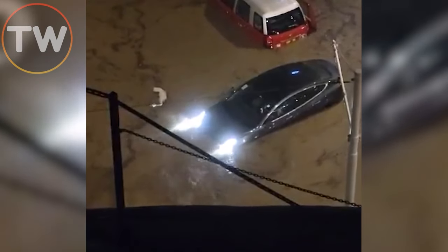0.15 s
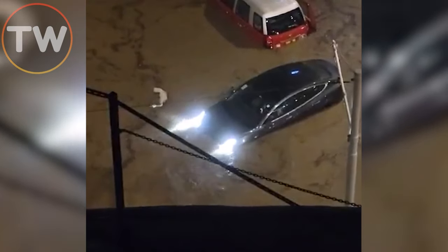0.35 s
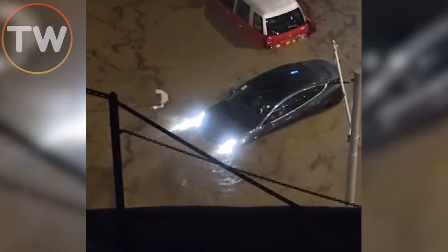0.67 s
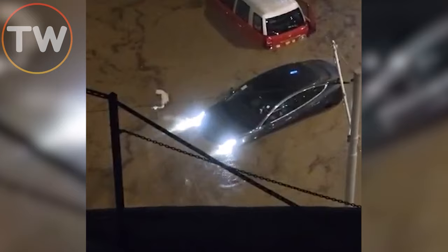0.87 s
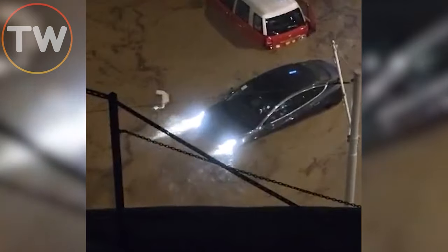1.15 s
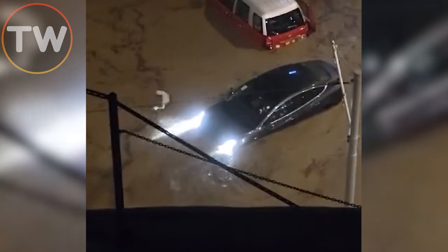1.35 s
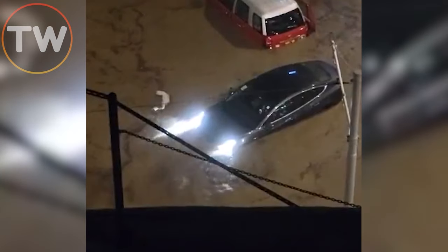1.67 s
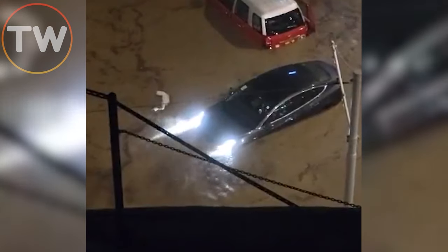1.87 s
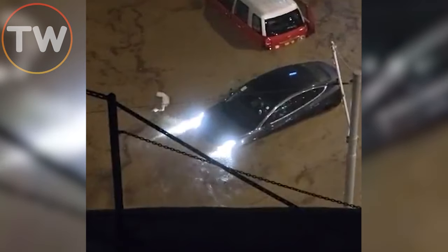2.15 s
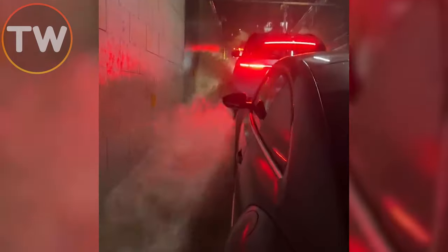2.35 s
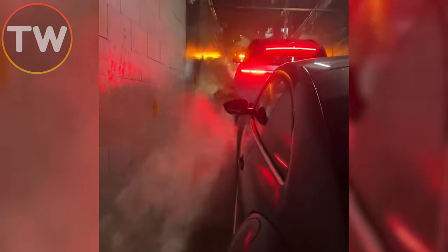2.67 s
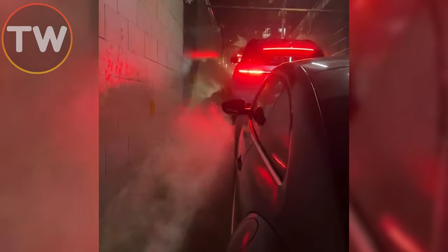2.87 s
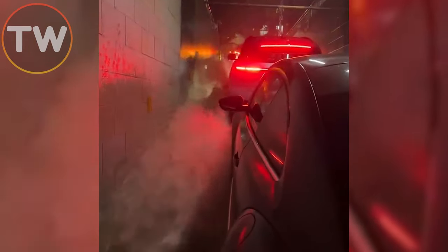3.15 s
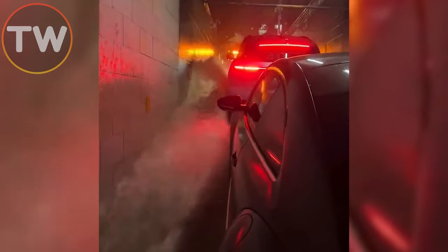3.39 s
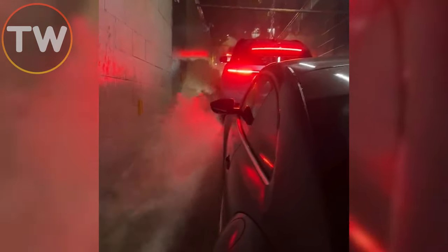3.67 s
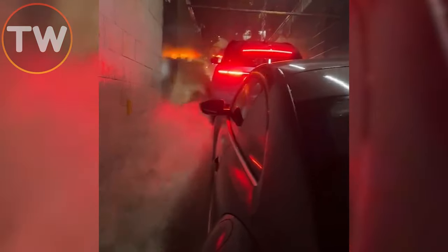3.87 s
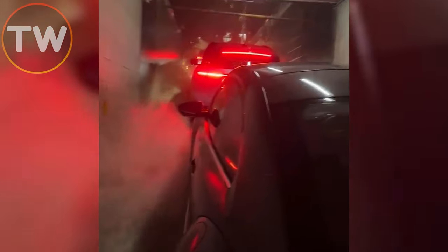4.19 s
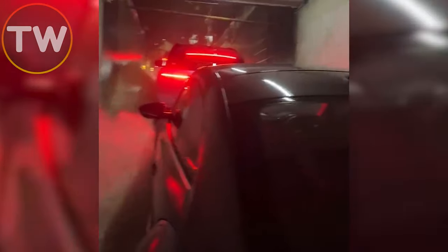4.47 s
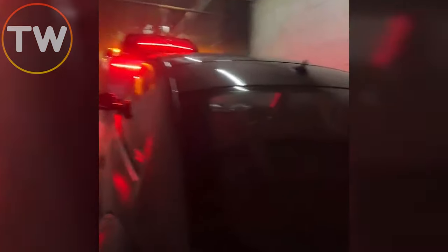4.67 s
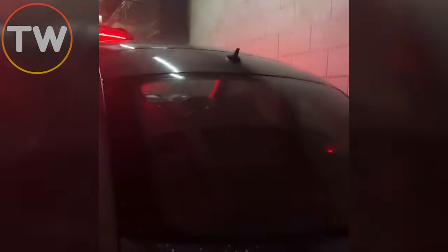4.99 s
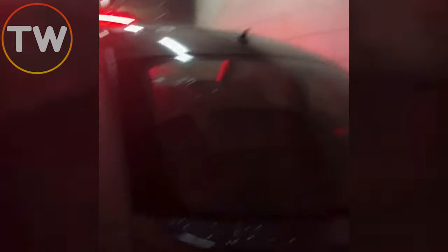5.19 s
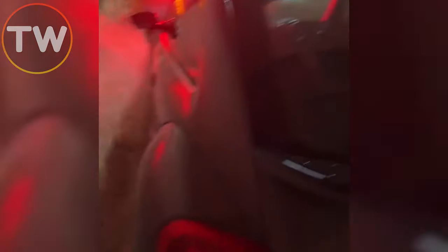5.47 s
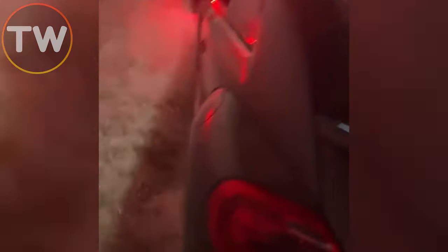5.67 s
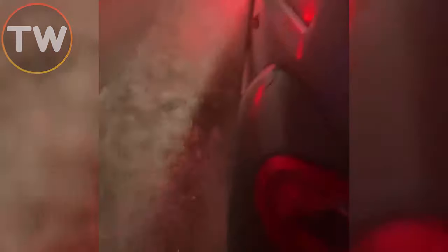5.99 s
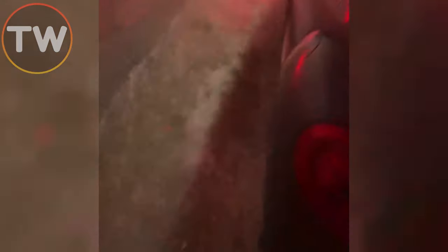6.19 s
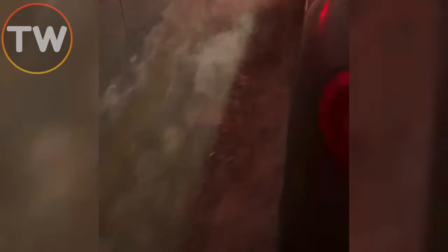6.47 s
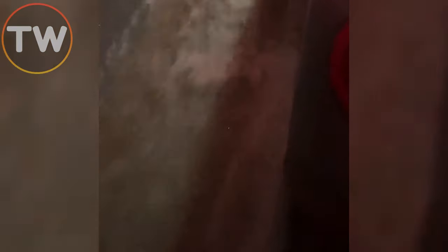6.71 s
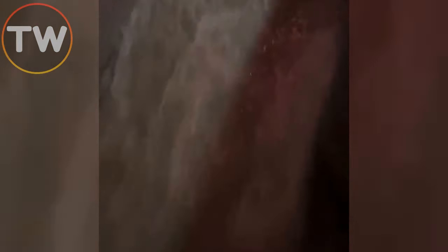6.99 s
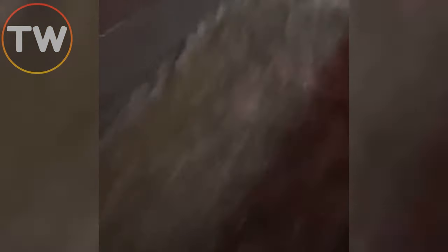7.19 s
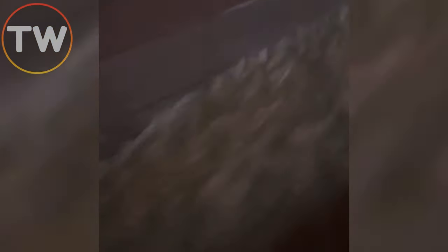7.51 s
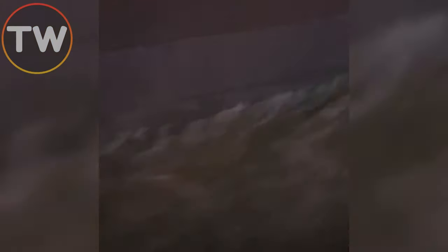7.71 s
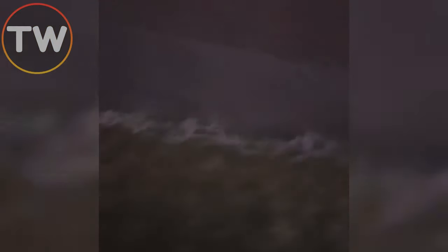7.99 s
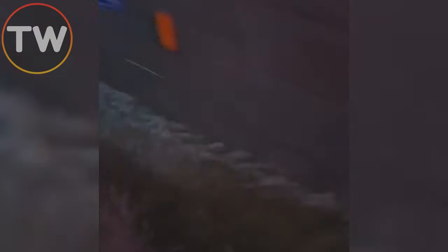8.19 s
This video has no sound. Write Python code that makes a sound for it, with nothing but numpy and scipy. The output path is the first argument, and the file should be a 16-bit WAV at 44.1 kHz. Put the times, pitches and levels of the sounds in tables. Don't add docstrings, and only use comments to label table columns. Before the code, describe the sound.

Dense downpour roar with a faint low engine idle and a quick buzzy car horn, cut off sharply, then steadier, softer torrent noise.

```python
import sys
import numpy as np
from scipy import signal
from scipy.fft import dct
from scipy.io import wavfile
from scipy.ndimage import uniform_filter1d, map_coordinates

SR = 44100
rng = np.random.default_rng(int(sys.argv[2]) if len(sys.argv) > 2 else 0)


def gain_from_decibels(decibels):
    exponent = np.asarray(decibels, float) / 20
    return 10 ** exponent


def unload_audio(sound):
    columns = np.transpose(np.atleast_2d(sound))
    steps = np.round(np.clip(columns, -1, 1) * 32767)
    wavfile.write(sys.argv[1], SR, steps.astype(np.int16))


N = 368182
CUT_S, RESUME_S = 2.36665, 2.6455
WINDOW = 1024
TAPER = np.sin(np.pi * (np.arange(2 * WINDOW) + .5) / (2 * WINDOW))


def street_rain():
    # f/Hz, level/dB per Hz
    colour = [(15, -57), (30, -21.5), (56, -8), (150, -6.5), (250, -3), (410, -1.5), (750, -5.5),
              (1200, -2.5), (2350, -4), (4070, -14), (8300, -18.5), (9500, -22.5), (10200, -31),
              (13700, -27.5)]
    # f/Hz, step/dB above the noise there
    steps = [(300, -10), (1500, -3), (2500, 3), (3100, 7.5), (4500, 6.5), (6500, 4), (9300, 5), (10000, 11),
             (10700, 7.5), (13500, 6.5)]
    return water(colour, downpour, steps, per_s=30000, spread_db=1.0,
                 surge_db=0.92, patch_db=1.0, flicker_db=0.95, jump_db=2.5)


def downpour(s):
    # t/s, level/dB
    strength = [
        (0, -18),
        (.6, -17),
        (1.3, -17),
        (1.8, -16),
        (2.1, -16),
        (2.37, -17.5),
    ]
    level_db = column(strength, 1, s)
    swing_db = level_db - np.mean(np.array(strength)[:, 1])
    rumble_follows, hiss_follows = -0.36, -.3
    return level_db, rumble_follows * swing_db, hiss_follows * swing_db


def ramp_water():
    # f/Hz, level/dB per Hz
    colour = [(15, -55), (30, -27), (65, -6), (105, -5), (220, -2.5), (325, -1.5), (800, -4.5),
              (2500, -4.5), (3600, -8), (4500, -12), (6000, -12.5), (8800, -17), (10300, -18),
              (13700, -22.5)]
    # f/Hz, step/dB above the noise there
    steps = [(300, -12), (3000, -4), (6000, 1), (10000, 4), (12500, 5.5), (13600, 8)]
    return water(colour, torrent, steps, per_s=30000, spread_db=.8,
                 surge_db=0.28, patch_db=0.62, flicker_db=0.46, jump_db=2.5)


def torrent(s):
    since_duck = np.maximum(s - 3.16, 0)
    turned_s = np.maximum(s - 3.95, 0)
    fast = 1 - np.exp(-since_duck / .035)
    slow = 1 - np.exp(-since_duck / 0.84)
    level_db = -22 - 3.5 * fast - 3.5 * slow + 0.47 * turned_s
    rumble_db = -0.24 * slow + 0.2 * turned_s
    hiss_db = 0.74 - 0.54 * turned_s
    return level_db, rumble_db, hiss_db


def water(colour, flow, steps, per_s, spread_db, surge_db, patch_db, flicker_db, jump_db):
    cells = to_cells(splashes(per_s, spread_db))
    s = np.arange(len(cells)) * WINDOW / SR
    hz = np.maximum((np.arange(WINDOW) + .5) * SR / 2 / WINDOW, 15)
    surges_db = surge_db * patches(hz, s, .4, 9.0)
    swell_db = surges_db + patch_db * patches(hz, s, 2.98, 6.0)
    cells = cells * gain_from_decibels(flicker_db * patches(hz, s, 6.0, 25.0))
    step = gain_from_decibels(at_hz(steps, hz) + jump_db * patches(hz, s, 16.0, 26.0, order=0))
    cells = np.sign(cells) * np.floor(np.abs(cells) / step + .4) * step
    cells = cells / uniform_filter1d(np.sqrt(np.mean(cells ** 2, axis=0)) + 1e-9, size=25)
    lows = np.clip(np.log2(900 / hz), 0, 1)
    tops = np.clip(np.log2(hz / 2300), 0, 1)
    _, rumble_db, hiss_db = flow(s)
    tilt_db = np.outer(rumble_db, lows) + np.outer(hiss_db, tops)
    sound = from_cells(cells * gain_from_decibels(at_hz(colour, hz) + tilt_db + swell_db))
    middle_band = signal.butter(4, [700, 3000], "band", fs=SR, output="sos")
    middle = signal.sosfilt(middle_band, sound)
    level_db = flow(np.arange(N) / SR)[0]
    return sound / np.sqrt(np.mean(middle ** 2)) * gain_from_decibels(level_db)


def splashes(per_s, spread_db):
    sizes = gain_from_decibels(spread_db * np.minimum(rng.exponential(1, N), 5)) * rng.standard_normal(N)
    return rms_one(sizes * (rng.random(N) < per_s / SR))


def patches(hz, s, per_octave, per_s, order=1):
    where = np.meshgrid(s * per_s, np.log2(hz / hz[0]) * per_octave, indexing="ij")
    field = map_coordinates(rng.standard_normal((400, 200)), where, order=order, mode="wrap")
    return field * (1 + .4 * order)


def horn():
    # multiple of the base pitch, level/dB
    partials = [(5, -8), (6, -4), (7, 0), (8, -6), (9, -11)]
    base_hz = 483.2
    t = np.arange(N) / SR
    shakes = uniform_filter1d(rng.standard_normal((len(partials), N)), size=600, axis=1)
    tone = np.zeros(N)
    for (multiple, level_db), shake in zip(partials, shakes):
        tone += gain_from_decibels(level_db) * np.sin(2 * np.pi * multiple * base_hz * t + 26 * shake)
    start_s, attack_s, hold_s, release_s = .522, .014, .15, .03
    corners = start_s + np.cumsum([0, attack_s, hold_s, release_s])
    return tone * gain_from_decibels(-23) * np.interp(t, corners, [0, 1, 1, 0]) ** 2


def idle():
    # t/s, f/Hz, level/dB
    engine = [
        (0, 62, -46),
        (1.2, 60, -45),
        (1.5, 54, -39),
        (1.9, 55, -37),
        (2.37, 60, -37),
    ]
    t = np.arange(N) / SR
    unsteady = uniform_filter1d(rng.standard_normal(N), size=4000)
    phase = 2 * np.pi * np.cumsum(column(engine, 1, t)) / SR
    return gain_from_decibels(column(engine, 2, t) + 3) * np.sin(phase + 40 * unsteady)


def difference(mid, level_db):
    shift = 687
    cells = to_cells(np.roll(mid, -shift))
    s = np.arange(len(cells)) * WINDOW / SR
    hz = (np.arange(WINDOW) + .5) * SR / 2 / WINDOW
    when, where, wide = rng.random((3, len(cells)))
    per_s = np.where(s < CUT_S, .5, 3.2)
    parted = when < per_s * WINDOW / SR
    low_hz = 4500 * (12000 / 4500) ** where
    octaves = .25 * (.5 + 2 * wide ** 4 + .3)
    high_hz = low_hz * 2 ** octaves
    mask = parted[:, None] * (hz > low_hz[:, None]) * (hz < high_hz[:, None])
    signs = rng.choice([-1, 1], cells.shape)
    return np.roll(from_cells(cells * mask * gain_from_decibels(level_db) * signs), shift)


def phone_top(x):
    edge = signal.ellip(12, .2, 45, 13890, fs=SR, output="sos")
    return signal.sosfiltfilt(edge, x)


def to_cells(x):
    slices = np.pad(x, (WINDOW, 2 * WINDOW - len(x) % WINDOW)).reshape(-1, WINDOW)
    a, b, c, d = np.split(np.hstack([slices[:-1], slices[1:]]) * TAPER, 4, axis=1)
    return dct(np.hstack([-c[:, ::-1] - d, a - b[:, ::-1]]), type=4, norm="ortho")


def from_cells(cells):
    u, v = np.split(dct(cells, type=4, norm="ortho"), 2, axis=1)
    slices = np.hstack([v, -v[:, ::-1], -u[:, ::-1], -u]) * TAPER
    return (slices[:-1, WINDOW:] + slices[1:, :WINDOW]).ravel()[:N]


def rms_one(x):
    return x / np.sqrt(np.mean(x ** 2) + 1e-20)


def column(rows, k, s):
    return np.interp(s, np.array(rows)[:, 0], np.array(rows)[:, k])


def at_hz(points, hz)  :
    return np.interp(np.log(hz), np.log(np.array(points)[:, 0]), np.array(points)[:, 1])


def scene():
    t = np.arange(N) / SR
    street = street_rain() + horn() + idle()
    street = street / (1 + (street / .9) ** 8) ** (1 / 8)
    ramp = ramp_water()
    near_cut = np.exp((t - CUT_S).clip(None, 0) / .00016)
    street = phone_top(street) * (1 - near_cut) + near_cut
    lead_in = gain_from_decibels(-14) * (t > 2.6345)
    ramp = phone_top(ramp * np.where(t > RESUME_S, 1, lead_in))
    mid = street * (t < CUT_S) + ramp
    side = difference(mid, -2)
    return np.array([mid + side, mid - side])


def top_cut(x):
    return signal.sosfilt(signal.butter(12, 15900, fs=SR, output="sos"), x)


def record(dry):
    return top_cut(dry)


dry = scene()
out = record(dry)
unload_audio(out)
```